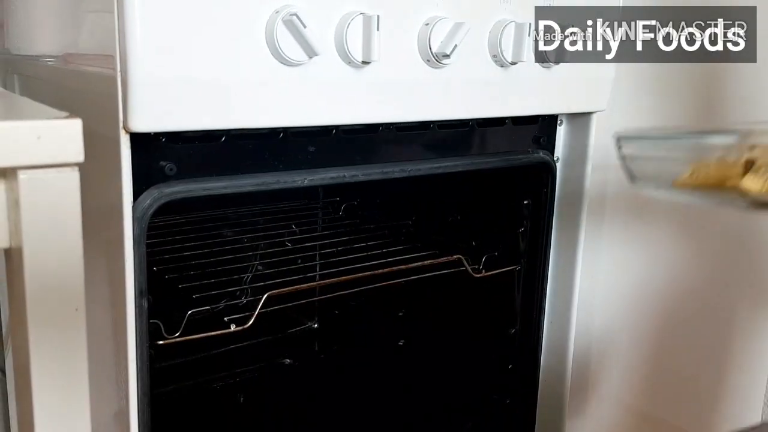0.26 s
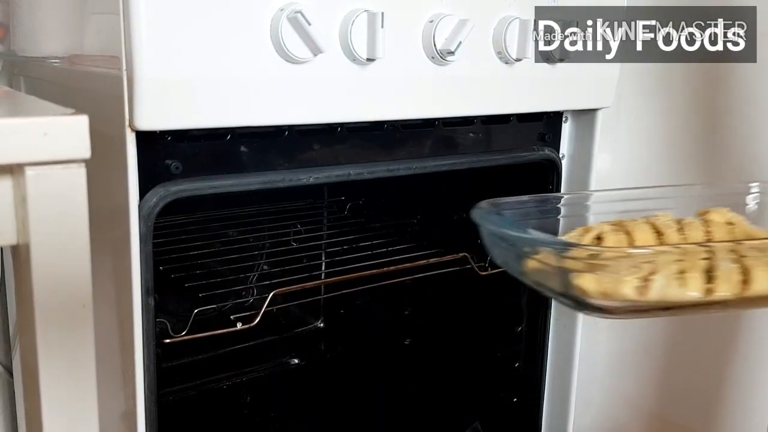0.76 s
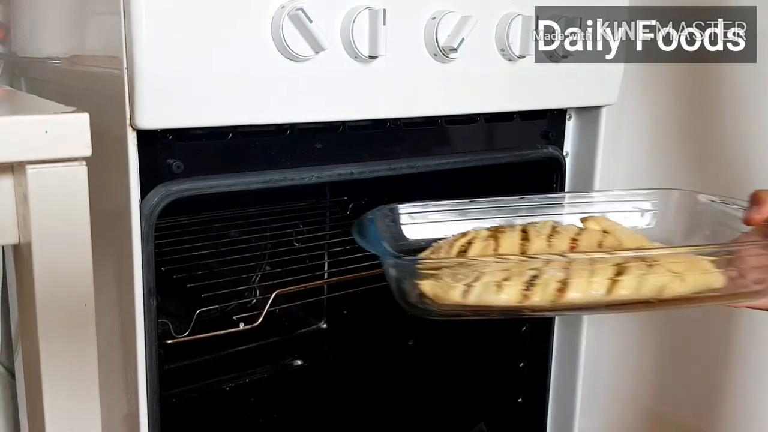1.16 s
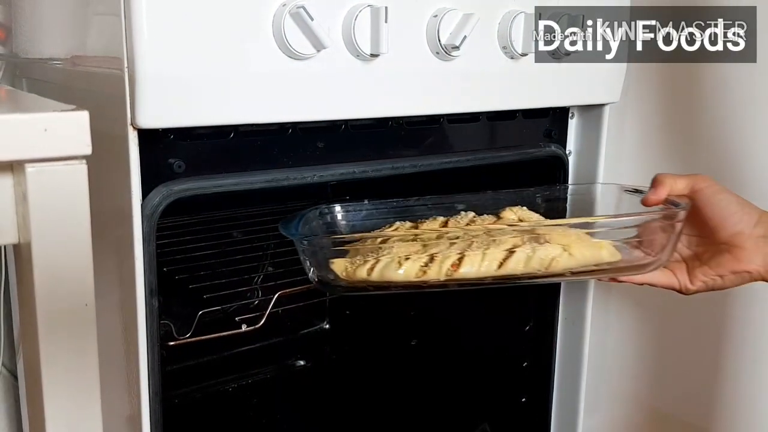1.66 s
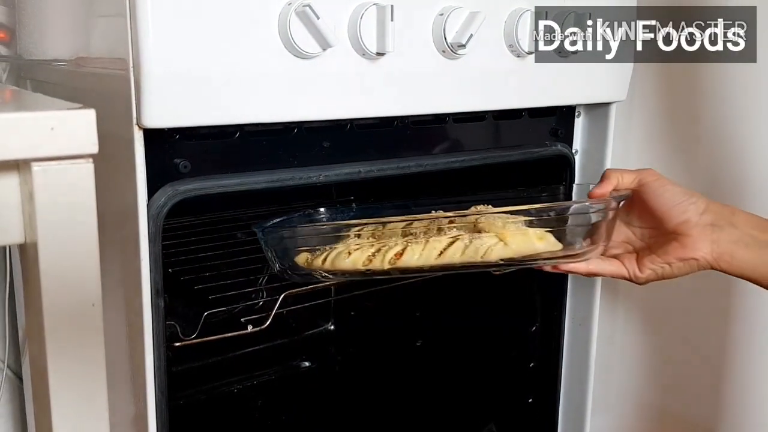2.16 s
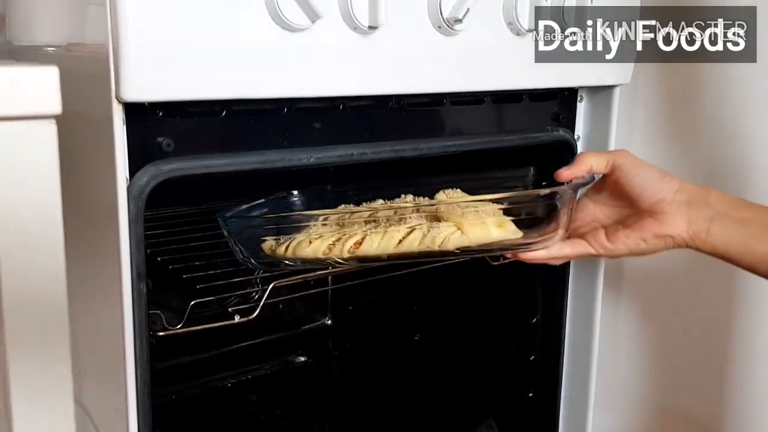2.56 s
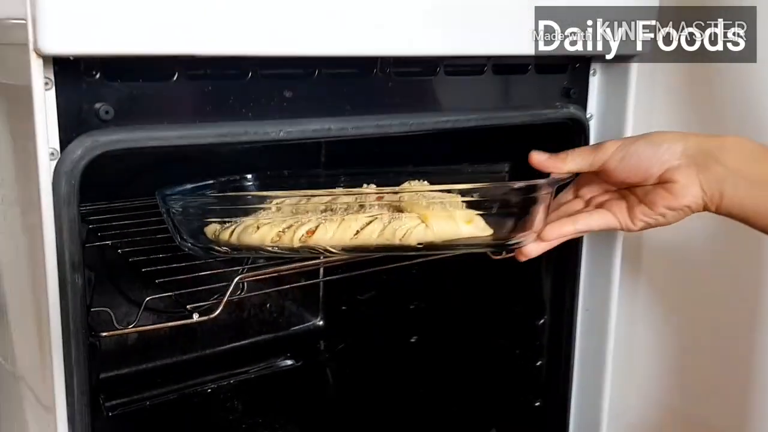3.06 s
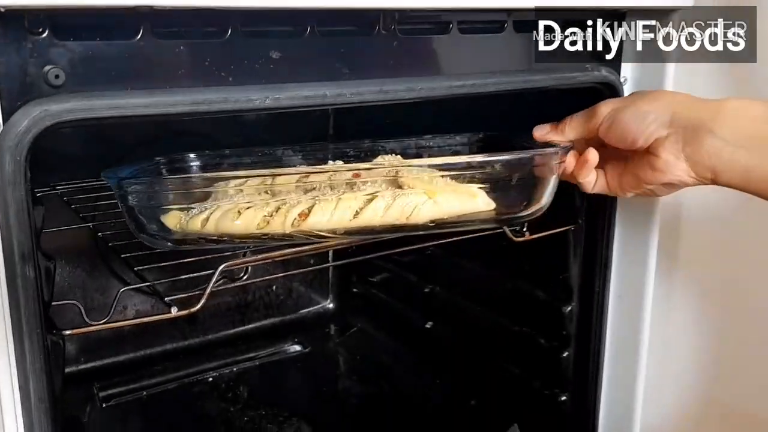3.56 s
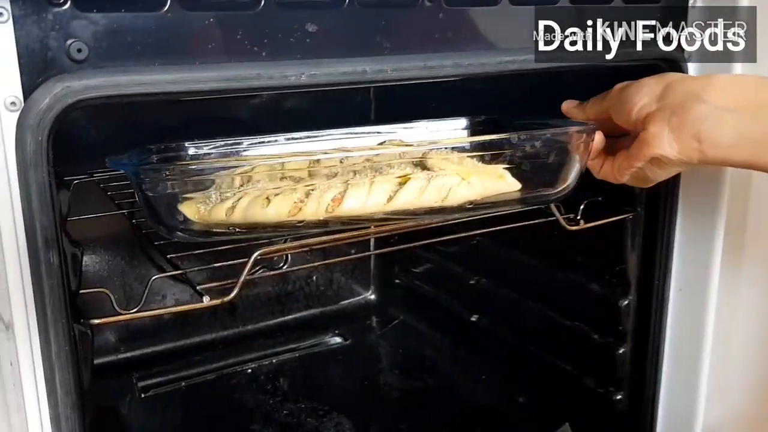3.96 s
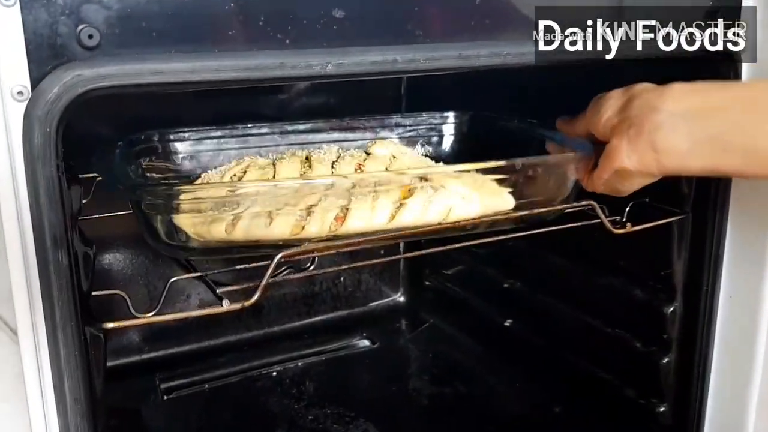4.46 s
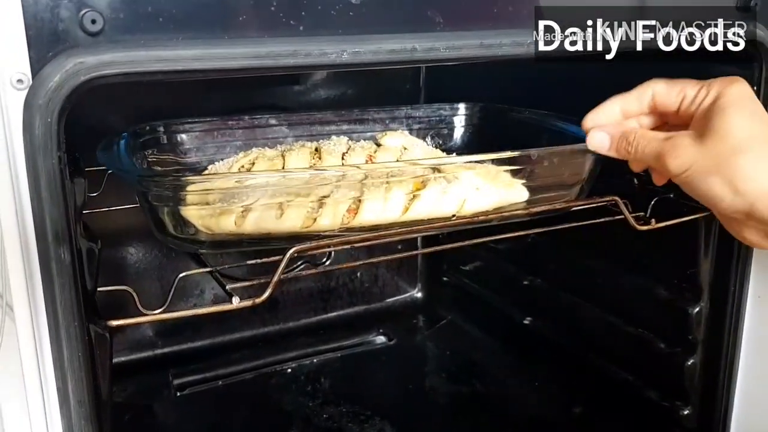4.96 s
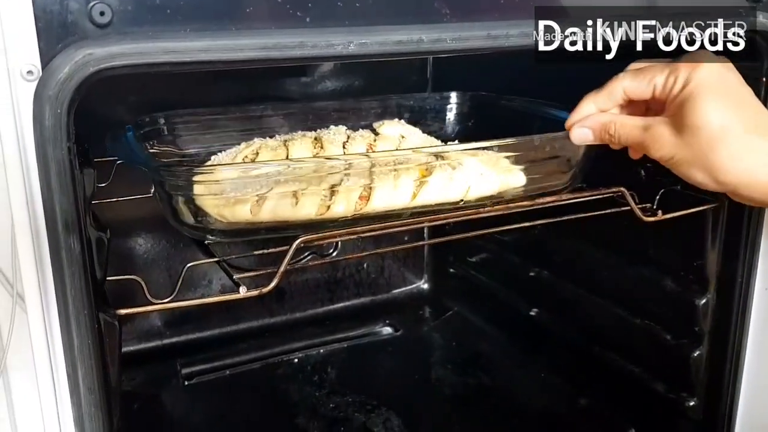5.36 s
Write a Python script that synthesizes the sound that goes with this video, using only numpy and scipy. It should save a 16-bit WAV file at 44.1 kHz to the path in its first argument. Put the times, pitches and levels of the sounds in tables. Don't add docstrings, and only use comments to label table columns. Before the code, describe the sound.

Close phone microphone in a quiet kitchen. After a second of soft rumble and hiss, a glass baking dish lightly touches an oven rack, taps and knocks with hollow bonks, then drops with a bright loud clink and dull slaps. After a pause it is shoved along the wires, bumps the stop hard, and rocks and scuffs to rest, with a short boxy oven echo.

```python
import sys
import numpy as np
from scipy import signal
from scipy.fft import rfft, irfft, next_fast_len
from scipy.io import wavfile
from scipy.ndimage import uniform_filter1d

SR = 44100
rng = np.random.default_rng(int(sys.argv[2]) if len(sys.argv) > 2 else 0)


def how_loud(loudness_db):
    steps = np.asarray(loudness_db, float) / 20
    return 10 ** steps


def dump(signal):
    limited = np.clip(np.atleast_2d(signal).T, -1, 1)
    pcm = np.round(limited * 32767).astype(np.int16)
    wavfile.write(sys.argv[1], SR, pcm)


N = 247753
SPAN = 3 * 2 ** 13
TOP_HZ = 15800

# frequency in Hz, level per Hz in dB.
HISS_COLOUR = [(880, -77), (1500, -10.5), (1850, -34), (2100, -35), (2270, -6.5), (2610, -7), (2830, -5.5),
               (3880, -4), (4420, 0.5), (5330, -2.5), (5830, -2.5), (7690, -5.5), (12400, 0.5),
               (15100, -4.5), (16000, -24)]
RUMBLE_COLOUR = [(15, -55), (25, -28), (54, 0.5), (86, -5), (113, -4.5), (130, -31), (170, -10.5),
                 (290, -120)]
HUM_COLOUR = [(59, -6), (100, -8), (140, 5), (172, -12.5), (211, -2.5), (280, -11.5), (330, -12),
              (430, -41), (730, -120)]
MURMUR_COLOUR = [(180, -58), (300, -19.5), (350, -14.5), (450, -4.5), (494, -11), (750, -25.5), (980, -65),
                 (1650, -120)]
RUSTLE_COLOUR = [(410, -13.5), (700, -2.5), (872, -5.5), (961, -4), (1130, 0.5), (1460, -10.5), (2010, -5),
                 (2270, -6.5), (2480, -6), (3000, -10), (3900, -78), (6600, -120)]
HISS_DB = -55

# frequency in Hz, likeness from -1 to 1.
BACKGROUND_LIKENESS = [(60, 0.91), (180, 0.98), (550, 0.56), (1650, -0.035), (4970, -0.034),
                       (15000, -0.014)]
CONTACT_LIKENESS = [(100, 0.98), (250, 0.98), (500, 0.91), (1000, 0.18), (3000, 0.048), (12000, 0.015)]
# frequency in Hz, left minus right in dB.
LEFT_RIGHT_LEAN = [(60, -2), (150, -0.5), (380, 1), (950, 3), (2380, 0.5), (5980, -3), (15000, 2.5)]

# time in seconds, level in dB.
HAND_LEVEL = [(0.0, -44.5), (0.11, -56.5), (0.22, -58.5), (0.48, -64.5), (0.97, -64.5), (1.58, -53.5),
              (1.67, -49.5), (2.07, -57.5), (3.16, -57), (3.43, -62.5), (4.3, -60), (4.62, -72),
              (4.99, -83), (5.22, -49), (5.4, -54.5), (5.62, -54)]
# start in seconds, hold in seconds, strength in dB, weight in dB (heavier means more hum).
SLIDES = [(-.04, 0.09, -61.5, 7), (1.468, 0.074, -66, 12.5), (1.716, 0.14, -50, -4),
          (2.08, 0.072, -60.5, -11), (2.292, 0.14, -53.5, -8), (2.458, 0.27, -54, 3),
          (2.963, 0.033, -45, -1), (3.16, 0.45, -73, 19.5), (3.645, 0.077, -63.5, 11.5),
          (4.46, 0.15, -42, -7), (4.6, 0.083, -49.5, 9.5), (4.795, 0.075, -54.5, 11),
          (5.035, 0.11, -74, 20), (5.34, 0.059, -67, -7)]
SLIDE_ATTACK_S, SLIDE_T60_S = 0.015, 0.75
LIGHT_DB, LIGHT_TILT = -0.5, 0.43
LOADED_S, LET_GO_S, LOAD_RAMP_S = 1.42, 5.55, 0.24
# hum, murmur and rustle in dB.
EMPTY_DB = [-63.5, -82, -69]
LOADED_DB = [-57.5, -67.5, -60]

# frequency in Hz, time to fall by 60 dB in seconds.
FADE = [(60, 1), (250, 0.63), (1000, 0.49), (3000, 0.43), (6000, 0.27), (14000, 0.093)]
# frequency in Hz, width in Hz, level in dB.
BOX = [(86, 30.8, 20), (132, 1.7, -30), (223.6, 96, 3), (500, 46, 2)]
# frequency in Hz, width in Hz, level in dB.
PANEL = [(94.4, 13.3, 4.5), (131.7, 0.5, -1), (204.6, 21.3, 12.5)]

# time in seconds, peak in dB, boom in dB, brightness in dB, top treble in dB.
TICK = [
    (1.1365, -50, -20, -10, -13),
    (1.14, -47, -20, -10, -19),
]
TOUCH = [
    (1.432, -33, -24, -12, -10.5),
    (1.546, -39.5, -17, -15, -19),
]
TAP = [
    (1.705, -30, -19, -7.5, -8.5),
]
KNOCK = [
    (2.25, -25, -27, -22, -31),
    (2.297, -24, -10, -26, -45),
    (2.541, -20.5, -32, -15.5, -22.5),
    (2.584, -24.5, -26, -22, -22),
]
BONK = [
    (2.285, -21, -9, -26, -31),
    (2.561, -22, -2.5, -26, -21),
]
CLINK = [
    (2.89, -9.5, -16, -11, -16.5),
]
SLAP = [
    (2.897, -24.5, -22, -16, -25),
    (2.98, -19, -7.5, -12, -16),
    (3.026, -26, -12, -17, -8),
]
THUD = [(1.472, -38.5, -2.5, -14, -6), (2.997, -18.5, -16, -11.5, -24), (3.028, -17, -28, -10, -17),
        (3.044, -30.5, -28, -16, -3.5), (3.69, -65, -9, -6, 0), (4.6, -19.5, -24.5, -13, -10),
        (4.657, -28, -22, -9.5, -9)]
SHOVE = [
    (3.565, -31, -27, -5, -5.5),
    (4.432, -13, -10, -11.5, -19.5),
    (4.504, -17.5, -13, -13, -21),
]
DROP = [
    (4.487, -29, 0.72, -7, -4.5),
    (4.496, -24, 4.5, -1.5, -11),
]
SEAT = [
    (4.532, -12.5, -19, -13.5, -15),
    (4.54, -13.5, -18.5, -4.5, -2.5),
]
SCUFF = [(1.744, -34, 4.5, -27, -9), (4.403, -40.5, 14.5, -20, -4), (4.719, -40.5, -12, -5.5, -5),
         (4.818, -27.5, -18, -11, -6), (4.936, -36, -0.5, -17, -12), (5.351, -42, 1, -16, -3),
         (5.398, -41.5, -4, -21, -3)]
ROCK = [
    (4.769, -25, -6, -14, -24),
    (4.918, -27.5, -11.5, -9, -13),
    (4.998, -30.5, -6, -35, -13),
    (5.385, -38, -6.5, -23, -17),
]

# frequency in Hz, width in Hz, level in dB.
TICK_BODY = [(950, 300, -6), (2910, 400, 7)]
TOUCH_BODY = [(1130, 48, 2.5), (1340, 100, -7), (1990, 120, -0.5), (2840, 390, -0.5), (3560, 100, 7),
              (4940, 240, 0), (6080, 270, 7.5), (10100, 590, -1)]
TAP_BODY = [(1100, 530, -7.5), (2560, 150, -4), (3030, 180, -0.5), (5150, 260, -5), (5670, 130, -8),
            (6080, 360, -4), (9960, 270, -2)]
KNOCK_BODY = [(1950, 270, -12), (2250, 94, -5.5), (4160, 120, -9.5), (4760, 100, -5), (5970, 210, -8)]
BONK_BODY = [(243, 38, 3), (663, 180, 3), (1162, 113, 12.5), (1540, 92, 1)]
CLINK_BODY = [(735, 123, 0.5), (1810, 48, 0), (2370, 120, -0.5), (4220, 840, -5.5), (4930, 79, -5),
              (9400, 230, 2), (10050, 9, 11), (11650, 48, 1)]
SLAP_BODY = [(300, 160, 7.5), (730, 200, 0), (2350, 1300, -1)]
THUD_BODY = [(200, 27, 0.5), (490, 160, -4.5), (1190, 33, -2), (1690, 330, -7), (2320, 98, -6.5)]
SHOVE_BODY = [(483, 61, 1), (2050, 890, -2), (3280, 310, -16), (4440, 84, -3), (5830, 170, -7.5)]
DROP_BODY = [(206, 52, 3.5), (394, 44, 0.2), (533, 84, -0.5)]
SEAT_BODY = [(2040, 1060, -5.5), (4660, 150, -18), (12300, 98, -12)]
SCUFF_BODY = [(1850, 830, -1), (2470, 260, -28), (4540, 970, -0.5), (6260, 440, -16)]
ROCK_BODY = [(250, 150, -2.5), (593, 160, -7.5), (1804, 92, 1), (2300, 61, -1.5)]

# frequency in Hz, width in Hz (narrow rings longer), level in dB.
WIRE = [(1140, 5.2, 18), (2220, 12, 8), (2350, 1.6, 32)]
SHORT_WIRE = [(1415, 28, 23.5), (3370, 20, 8)]
LONG_WIRE = [(824, 6.1, 23.5), (1040, 14, 10), (1360, 8.1, -4), (1570, 12, 22)]
GLASS = [(588, 18, 9), (2958, 14, 13), (4934, 7, 16), (5070, 5, 14)]
RAIL = [(1852, 25, 13), (5769, 28, 7), (10895, 34, 15.5)]
BEND = 0.53


def unit(x):
    return x / np.sqrt(np.mean(x ** 2) + 1e-20)


def along(points, hz):
    point_hz, value = np.transpose(points)
    return np.interp(np.log(hz + 1), np.log(point_hz + 1), value)


def filtered(x, response):
    n = x.shape[-1]
    padded = 2 * next_fast_len(n // 2 + 4096)
    spectrum = rfft(x, padded) * response(np.fft.rfftfreq(padded, 1 / SR))
    return irfft(spectrum, padded)[..., :n]


def resonances(rows, f):
    return sum(how_loud(db) * 1j * f * width / (centre * centre - f * f + 1j * f * width)
               for centre, width, db in rows)


def causal(points, f):
    cepstrum = irfft(np.log(how_loud(along(points, f))))
    half = len(cepstrum) // 2
    cepstrum[1:half] *= 2
    cepstrum[half + 1:] = 0
    return np.exp(rfft(cepstrum))


def paired(two, alike):
    def turn(hz):
        return np.arccos(np.clip(along(alike, hz), -1, 1)) / 2

    mid, side = filtered(two, lambda hz: np.array([np.cos(turn(hz)), np.sin(turn(hz))]))
    return np.array([mid + side, mid - side])


def rush(colour, patchy_db):
    z = signal.stft(rng.standard_normal((2, N)), nperseg=1024)[2]
    patches = uniform_filter1d(rng.standard_normal(z.shape[1:]), 4, 0)
    patches = unit(uniform_filter1d(patches, 5, 1))
    two = signal.istft(z * how_loud(patchy_db * patches), nperseg=1024)[1][:, :N]
    coloured = filtered(two, lambda hz: how_loud(along(colour, hz)))
    return unit(paired(coloured, BACKGROUND_LIKENESS))


def rack():
    t = np.arange(0, N + 64, 64) / SR
    load = np.minimum(t - LOADED_S, LET_GO_S + LOAD_RAMP_S - t) / LOAD_RAMP_S
    load = np.clip(load, 0, 1)
    power = how_loud(np.outer(EMPTY_DB, 1 - load) + np.outer(LOADED_DB, load)) ** 2
    for start, hold, db, weight_db in SLIDES:
        attack = np.clip((t - start) / SLIDE_ATTACK_S, 0, 1)
        since_release = np.maximum(t - start - SLIDE_ATTACK_S - hold, 0)
        shape = attack * how_loud(-60 * since_release / SLIDE_T60_S)
        levels_db = db + np.array([weight_db, 0, LIGHT_DB - LIGHT_TILT * weight_db])
        power = power + np.outer(how_loud(levels_db), shape) ** 2
    return [np.interp(np.arange(N) / SR, t, np.sqrt(p)) for p in power]


def kitchen():
    hand = how_loud(3.0 + np.interp(np.arange(N) / SR, *np.transpose(HAND_LEVEL)))
    hum, murmur, rustle = rack()
    bed = hand * rush(RUMBLE_COLOUR, patchy_db=-0.5)
    bed = bed + hum * rush(HUM_COLOUR, patchy_db=2.5)
    bed = bed + murmur * rush(MURMUR_COLOUR, patchy_db=2.5)
    bed = bed + rustle * rush(RUSTLE_COLOUR, patchy_db=3.2)
    return bed + how_loud(HISS_DB) * rush(HISS_COLOUR, patchy_db=2.5)


def oven_tail():
    hz, t, z = signal.stft(rng.standard_normal((2, SPAN)), SR, nperseg=256)
    fading = z * how_loud(-60 * t / along(FADE, hz)[:, None])
    two = signal.istft(fading, SR, nperseg=256)[1][:, :SPAN]
    two = two * (1 - np.exp(-np.arange(SPAN) / SR / 0.00067))
    tail = filtered(paired(two, CONTACT_LIKENESS), lambda f: 1 + resonances(BOX, f))
    return tail / np.linalg.norm(two[0])


def contact(db, boom_db, bright_db, top_db, length, body, rings, rise, blow_db, wet_db):
    t = np.arange(SPAN) / SR
    length = max(length, .001)
    colour = [(20, boom_db - 60), (60, boom_db + 3.0), (140, boom_db - 0.5), (300, boom_db + 10),
              (900, 0.019), (2600, 0.027), (5500, bright_db + 8),
              (8200, (bright_db + top_db) / 2 + 2.5), (11000, top_db + 7.5), (16000, top_db)]

    bounce = np.clip(rng.standard_normal(SPAN // 64), -1.5, 1.5)
    chatter = how_loud(2.33 * np.repeat(bounce, 64))
    grit = paired(rng.standard_normal((2, SPAN)), CONTACT_LIKENESS)
    rattle = grit * chatter * np.exp(-t / length) * (1 - np.exp(-t / (rise * length)))
    shaken = filtered(rattle, lambda f: 1 + how_loud(9.5) * resonances(body, f))

    blow = np.zeros((2, SPAN))
    blow[[0, 1], 60 + rng.integers(0, 9, size=2)] = np.sqrt(length * SR / 2)
    struck = filtered(blow, lambda f: how_loud(blow_db) * resonances(body, f) + resonances(rings + PANEL, f))
    since_blow = np.maximum(t - 60 / SR, 0)
    struck = struck * (1 - np.exp(-since_blow / (BEND * rise * length)))

    near = filtered(shaken + struck, lambda f: causal(colour, f))
    wet = signal.fftconvolve(near[:1], oven_tail(), axes=1)[:, :SPAN]
    fade_out = np.cos(np.pi / 2 * t / t[-1])
    return how_loud(db - 2) * (near + how_loud(wet_db) * wet) * fade_out


def dish():
    out = np.zeros((2, N + SPAN))
    # contacts, rattle length in seconds, body, rings, rise as a share of the length,
    # blow over rattle in dB, echo in dB.
    kinds = [
        (TAP, .016, TAP_BODY, [], .12, 3, 1.5),
        (TOUCH[:1], .017, TOUCH_BODY, WIRE[:1], .2, 3, 1.5),
        (TOUCH[1:], .01, TOUCH_BODY, SHORT_WIRE, .2, 3, 0),
        (KNOCK, .015, KNOCK_BODY, [], .15, -6, .7),
        (BONK[:1], .005, BONK_BODY, WIRE[:2], .9, 9, -5),
        (BONK[1:], .003, BONK_BODY, WIRE, .3, 9, -8),
        (CLINK, .016, CLINK_BODY, GLASS, .25, 0, -9),
        (THUD, .01, THUD_BODY, [], .12, 6, -1.5),
        (DROP, .008, DROP_BODY, [], .3, 17, -13),
        (SHOVE, .014, SHOVE_BODY, [], .5, -9, -6),
        (SEAT, .0125, SEAT_BODY, RAIL, .4, 3, -4),
        (SCUFF, .024, SCUFF_BODY, [], .6, -30, -6),
        (ROCK, .002, ROCK_BODY, LONG_WIRE, .4, 20, -8),
        (SLAP, .004, SLAP_BODY, [], .2, 12, -5),
        (TICK, .001, TICK_BODY, [], .3, 15, -15)]
    for contacts, *kind in kinds:
        for time, *levels in contacts:
            start = round((time - .002) * SR)
            out[:, start:start + SPAN] += contact(*levels, *kind)
    return filtered(out[:, :N], lambda f: how_loud(np.outer([.5, -.5], along(LEFT_RIGHT_LEAN, f))))


def scene():
    return dish() + kitchen()


def band_limit(x):
    return signal.sosfilt(signal.butter(12, 16480, fs=SR, output="sos"), x)


def record(dry):
    def port(hz):
        bass_cut = (1j * hz / (38 + 1j * hz)) ** 2
        return (hz < TOP_HZ) * bass_cut

    return band_limit(filtered(dry, port))


dry = scene()
out = record(dry)
dump(out)
```